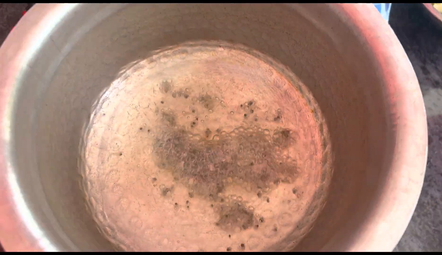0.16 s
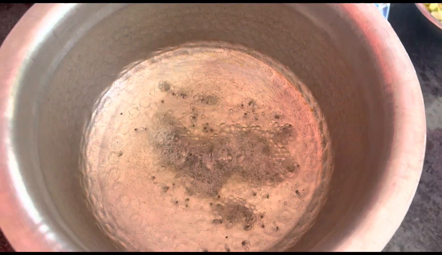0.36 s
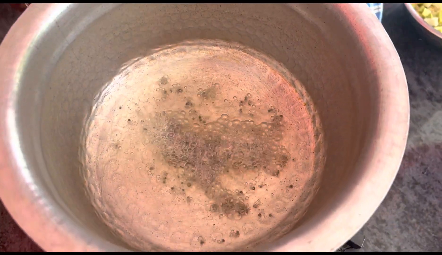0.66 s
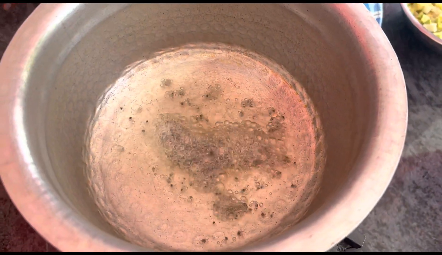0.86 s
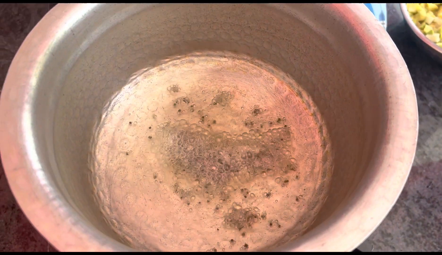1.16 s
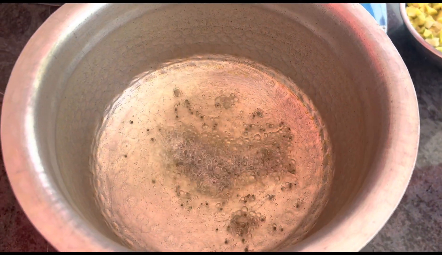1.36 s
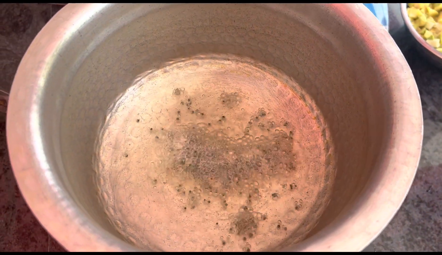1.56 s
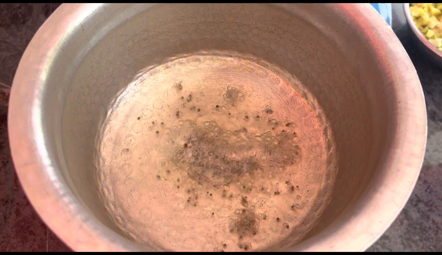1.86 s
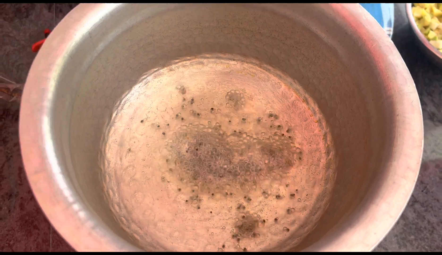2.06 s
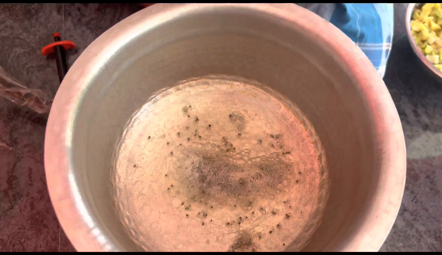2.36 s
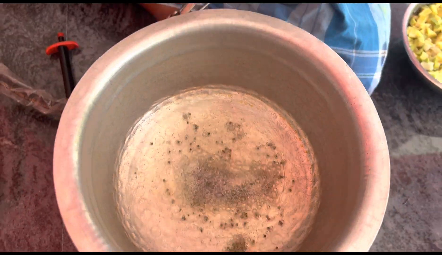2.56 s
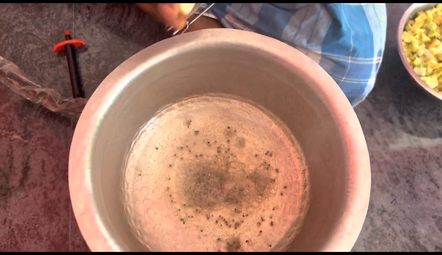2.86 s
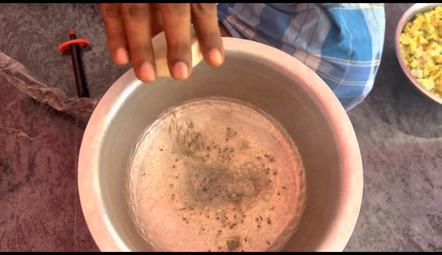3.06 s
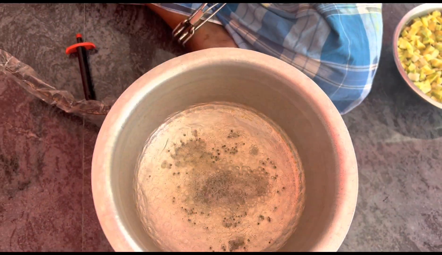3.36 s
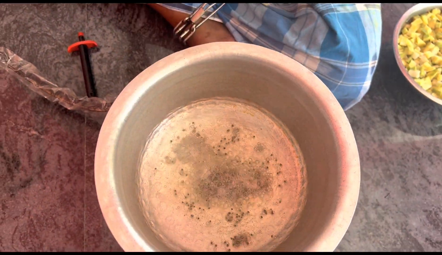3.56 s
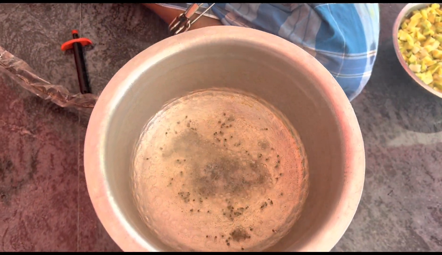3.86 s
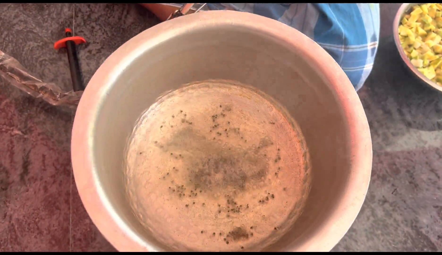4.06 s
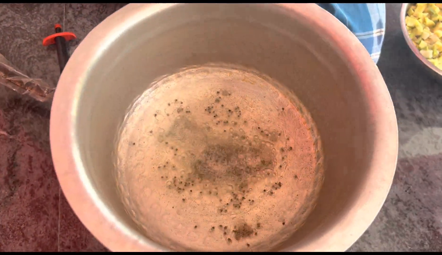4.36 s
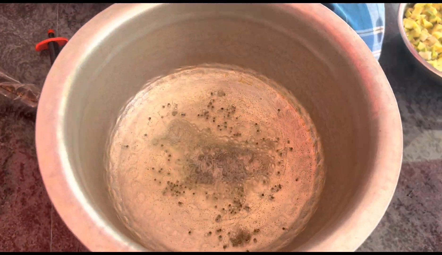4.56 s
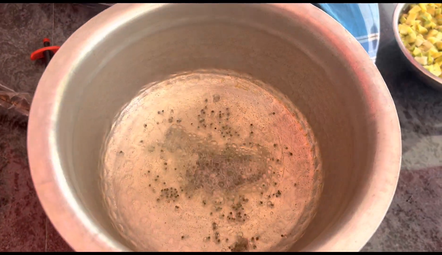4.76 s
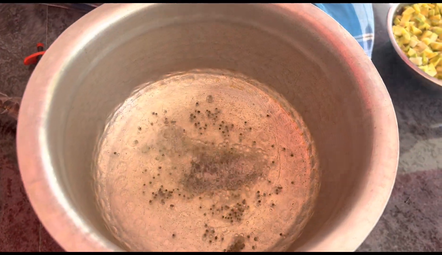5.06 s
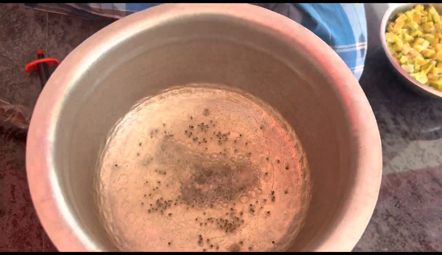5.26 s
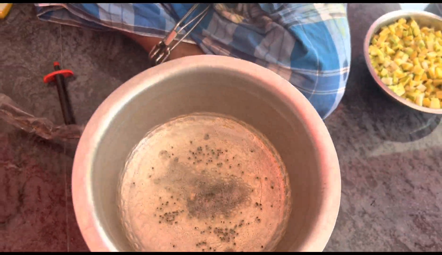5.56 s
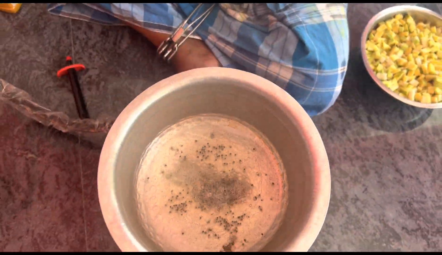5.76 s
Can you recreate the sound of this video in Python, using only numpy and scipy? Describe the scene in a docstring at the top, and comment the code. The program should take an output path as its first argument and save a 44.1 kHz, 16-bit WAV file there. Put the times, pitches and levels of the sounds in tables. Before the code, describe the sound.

Small seeds pop and splutter in fizzing hot oil in a metal pot, over a burner's faint low hum.

```python
"""Small seeds burst in hot oil in a wide metal pot, close under a hand-held camera. From the start
each pop is a snap, a short hollow note and a dying spray; the oil fizzes between them and a low hum
wavers over the burner's rush. From 0.75 s the camera's casing slips in the hand, creaking near 3.3 s.
Between 3.2 and 4.4 s a vessel further off is knocked four times, the last the hardest.
Towards the end the pops thin out and the fizz sinks."""
import sys
import numpy as np
from scipy import signal
from scipy.fft import rfft, irfft, next_fast_len
from scipy.io import wavfile
from scipy.ndimage import uniform_filter1d, map_coordinates

SR = 44100
rng = np.random.default_rng(int(sys.argv[2]) if len(sys.argv) > 2 else 0)


def transcribe(signal):
    """Save signal, clipped to [-1, 1], as a 16-bit WAV file at the path in sys.argv[1]."""
    frames = np.atleast_2d(signal).T
    limited = np.clip(frames, -1, 1)
    pcm = np.round(limited * 32767).astype(np.int16)
    wavfile.write(sys.argv[1], SR, pcm)


N = 260315

# how hard the oil fries: t/s, sizzle level/dB, steam hiss level/dB
FRYING = [(0.0, -37, -65), (1.13, -36, -56), (1.28, -40.5, -50), (1.79, -36, -53), (1.95, -40.5, -43.5),
          (2.45, -37, -47.5), (2.68, -37, -44.5), (2.96, -41, -52), (3.07, -41, -45), (3.3, -44, -56),
          (3.55, -41, -50), (3.93, -43.5, -59), (4.16, -39.5, -43.5), (4.32, -35, -43), (4.62, -45.5, -49),
          (4.81, -49.5, -50.5), (5.06, -39.5, -50), (5.9, -45, -58.5)]


def pops(spread_db=3.5):
    """The husk snaps; the steam pocket sounds a note, thuds in the oil and rings the pot; spray trails."""
    # the louder seeds: t/s, note level/dB, note f/Hz, snap level/dB, spray against the note/dB
    loud_pops = [(.0152, -10, 2290, -17, -23), (.0242, -3, 3500, -10, -15), (.069, -12, 2940, -10, -20),
                 (.0947, -11.5, 7350, -36, -20), (.0983, -7, 2680, -30, -14), (.1579, -10, 2800, -17, -25),
                 (.1745, -14.5, 3430, -37, -15), (.208, -8.5, 4550, -16, -9), (.2117, -6, 6550, -29, -24),
                 (.228, -14, 4000, -34, -6), (.238, -11, 5200, -34, -12), (.2451, -18, 1250, -32, -2),
                 (.2728, -6, 2760, -18, -11), (.3375, -11, 5840, -16, -21), (.3571, -24, 4440, -17, -29),
                 (.3832, -19.5, 6400, -23, -15), (.4072, -12, 5000, -17, -14), (.464, -17.5, 2700, -40, -3),
                 (.4808, -14, 6600, -26, -23), (.4925, -9, 2950, -35, -5), (.5102, -3, 6700, -2.5, -21),
                 (.5617, -18.5, 3190, -30, -3), (.571, -11.5, 4730, -14, -8), (.635, -16, 3520, -30, -23),
                 (.653, -18, 2620, -31, -25), (.688, -7, 6270, -11, -21), (.6909, -10.5, 2640, -28, -4),
                 (.6988, -8, 3420, -6.5, -16), (.7525, -16.5, 2820, -20, -6),
                 (.7841, -14.5, 8160, -32, -16), (.821, -12.5, 3480, -37, -8),
                 (.8511, -13.5, 3490, -33, -17), (.8636, -14, 3450, -28, -12), (.9304, -7, 5750, -44, -15),
                 (.936, -12.5, 3270, -9.5, 3), (.9503, -15, 3520, -38, -20), (1.003, -19.5, 2660, -46, -14),
                 (1.1034, -16, 6440, -30, -21), (1.1138, -13, 5860, -13.5, -7),
                 (1.154, -14.5, 3300, -21, -2), (1.1806, -11, 2900, -16, -11), (1.2233, -19, 3500, -37, -6),
                 (1.2278, -13.5, 7160, -27, -13), (1.282, -15.5, 5470, -15, -17),
                 (1.2871, -13.5, 3360, -19, -3), (1.3161, -15.5, 2700, -22, -7),
                 (1.331, -13.5, 8100, -26, -13), (1.341, -18.5, 4670, -13.5, -4),
                 (1.3936, -19.5, 5100, -35, -7), (1.4395, -12, 5870, -18, -25), (1.4804, -9, 3180, -6, -17),
                 (1.5049, -11, 6200, -19, -19), (1.5569, -14, 2630, -24, 4), (1.5767, -20, 5100, -35, -14),
                 (1.584, -8.5, 3950, -7.5, -12), (1.598, -11.5, 2390, -28, -14),
                 (1.636, -9.5, 6860, -14, -10), (1.6432, -7.5, 3520, -10, -14),
                 (1.7136, -14.5, 3800, -13, -8), (1.7273, -15, 6800, -39, -11),
                 (1.7813, -12.5, 3350, -36, -14), (1.8173, -20.5, 2740, -39, 0),
                 (1.8475, -20, 4100, -26, -7), (1.8573, -20, 5760, -17, -23),
                 (1.912, -13.5, 3000, -31, -14), (1.9244, -12, 7550, -11, -19),
                 (1.9352, -10, 3170, -10, -10), (1.9727, -15, 3540, -7.5, -11),
                 (1.9928, -22.5, 3190, -38, -13), (2.101, -15, 3240, -7.5, -16),
                 (2.1055, -13.5, 5700, -25, -2), (2.1516, -15, 3480, -14, -5.5),
                 (2.3473, -9, 3830, -19, -12), (2.369, -19, 3050, -21, -4), (2.407, -17, 3020, -16, -18),
                 (2.4476, -13, 5930, -13, -29), (2.4858, -11.5, 3030, -10, -13),
                 (2.5063, -16, 4090, -22, -20), (2.5403, -13.5, 3960, -36, -19),
                 (2.5562, -13, 5730, -17, -28), (2.5662, -14, 3950, -23, -19),
                 (2.5954, -11, 3770, -38, -10), (2.6136, -9, 2730, -38, -11.5), (2.738, -17, 5700, -16, -8),
                 (2.794, -22.5, 7000, -20, -6), (2.8195, -19, 5700, -13.5, -13),
                 (2.8375, -22, 5600, -16, 6), (2.8505, -16.5, 4050, -34, -10), (2.8711, -18, 3500, -18, -8),
                 (2.8808, -22, 3130, -32, -27), (2.9265, -9, 2740, -39, -8), (3.0451, -19, 6000, -10, 11),
                 (3.0491, -11.5, 8550, -14, -6), (3.0594, -15, 8270, -26, -9), (3.095, -20, 4100, -26, -5),
                 (3.1001, -22, 2290, -33, -11), (3.2599, -24.5, 4400, -25, -3),
                 (3.3076, -17, 3760, -23, -14), (3.3308, -15.5, 2800, -40, -10),
                 (3.3636, -10, 2540, -36, -5.5), (3.3858, -15, 2200, -30, -8),
                 (3.402, -7.5, 2450, -34, -13), (3.437, -22.5, 2150, -30, 3), (3.4706, -16, 3100, -18, -1),
                 (3.4905, -16, 2460, -22, -16), (3.5097, -15, 2700, -37, -22), (3.5269, -12, 2380, -27, -6),
                 (3.5367, -11, 2180, -36, -7), (3.5575, -12, 4400, -17, -9.5),
                 (3.6858, -20.5, 2730, -9, -7), (3.6932, -14.5, 2340, -44, -10),
                 (3.732, -11, 3900, -24, -13), (3.757, -23, 2620, -37, -3),
                 (3.8041, -11.5, 2680, -17, -6.5), (3.8517, -13.5, 6740, -25, -6),
                 (3.856, -9, 3270, -15, -4.5), (3.928, -17, 2080, -31, -6), (3.95, -15, 5900, -10, -16),
                 (4.1097, -17, 3800, -5.5, -21), (4.1198, -12.5, 4800, -15, -5.5),
                 (4.1494, -18.5, 2780, -37, -5), (4.3119, -9, 2730, -21, -11.5),
                 (4.3248, -17, 2580, -14.5, -15), (4.461, -16.5, 2450, -40, 1),
                 (4.4958, -21, 6980, -19, -21), (4.5047, -14, 2530, -43, -10.5),
                 (4.6687, -22, 3200, -21, -15), (4.7746, -25, 3330, -26, -1), (4.8138, -25, 2000, -39, -25),
                 (4.834, -20.5, 3670, -37, -10), (4.8379, -17, 5400, -12, -11),
                 (4.9045, -18.5, 2940, -25, -4), (4.928, -17.5, 3640, -29, -17),
                 (5.0327, -17, 3300, -5, -8), (5.0441, -12.5, 1900, -31, -17),
                 (5.1251, -4.5, 3720, -27, -15.5), (5.1434, -24, 3300, -13, -9),
                 (5.206, -11, 4860, -9.5, -7), (5.2394, -23, 2960, -28, -14),
                 (5.3236, -20, 4280, -16.5, -7), (5.3296, -14.5, 7050, -42, -19),
                 (5.3902, -12.5, 2880, -23, -15), (5.4513, -15.5, 6300, -24, -24),
                 (5.5438, -25, 4100, -23, -10), (5.5659, -36, 5640, -20, -20),
                 (5.5758, -13.5, 2280, -15.5, -4), (5.6294, -25, 4360, -24, -3),
                 (5.6543, -14.5, 4100, -34, -22), (5.6642, -17, 3260, -46, -9),
                 (5.7466, -28, 4390, -46, -14), (5.7733, -17.5, 4430, -14, -10)]
    # modes of the pot's wall and air, lowest first: f/Hz, width/Hz, level/dB
    pot_modes = [(1186, 44, 8.5), (1820, 9.8, -1), (2130, 17, 10), (2345, 16, 12), (2886, 64, 5.5),
                 (3625, 144, 2.5), (4146, 94, 6), (6200, 690, 1)]
    low_hz, low_width, low_db = pot_modes[0]
    s, db, hz, snap_db, spray_db = np.vstack([loud_pops, faint_pops()]).T[:, :, None]
    weight, place = rng.standard_normal((len(s), 2)).T[:, :, None]
    # the thud grows slower than the note; deeper notes thud harder
    thud_db = -26 + 0.52 * db - 2 * np.log2(hz / 3000) + 3 * weight
    t = np.arange(SR // 11) / SR
    note_noise, crack_noise = rng.standard_normal((len(s), 2, 2, len(t))).transpose(1, 2, 0, 3)
    hit = lambda peak_s: t / peak_s * np.exp(1 - t / peak_s)
    tail = lambda db, t60: amp(db - 60 * t / t60) * (1 - np.exp(-t / 0.00041)) * (1 - t / t[-1])
    pot = lambda f: sum(amp(level) * resonance(f, mode, width) for mode, width, level in pot_modes[1:])
    near = lambda f: resonance(f, hz, 1.08 * hz) ** 2  # a pop wakes the modes around its own note
    pocket = lambda f: resonance(f, hz, 0.5 * hz) ** 2 + 0.45 * resonance(f, 3880, 4960) ** 2
    note = burst(note_noise, hit(0.00053) + tail(-7.5, 0.025) + tail(spray_db - 2.5, 0.66),
                 lambda f: pocket(f) + 0.38 * pot(f) * near(f))
    snap = burst(crack_noise, hit(0.0004) + tail(-14, 0.015) + tail(spray_db - 22, 0.24),
                 lambda f: resonance(f, 11520, 5400) ** 2)
    thud = burst(crack_noise, hit(0.00041) + tail(-9.5, 0.14),
                 lambda f: resonance(f, 698, 1020) ** 2 + amp(low_db) * resonance(f, low_hz, low_width))
    body = (amp(db) * note + amp(thud_db) * thud) * sides(spread_db * place)
    return placed(s[:, 0], body + amp(snap_db) * snap)


def faint_pops(per_second=11, spray_db=-15):
    """Rows of small pops at random moments, louder where the oil sizzles harder."""
    count = round(per_second * N / SR)
    s = rng.random(count) * (N / SR)
    size, pitch, bright = rng.standard_normal((count, 3)).T
    sizzle_db = curves(FRYING)[0][(s * SR).astype(int)]
    db = sizzle_db + 9.5 + 3 * size
    hz = 4000 * 2 ** (0.43 * pitch)
    snap_db = db - 6.5 + 6 * bright
    return np.transpose([s, db, hz, snap_db, np.full(count, spray_db)])


def fizz(patch_db=3.33):
    """Countless small bubbles: patchy noise with ticks on it, coloured as sizzle and as steam."""
    # spectra of the sizzling oil and the hissing steam: f/Hz, relative level/dB
    sizzle_eq = [(500, -25), (900, -6.5), (1170, -1), (1500, 0), (2300, 4.5), (4100, 3), (6350, 5),
                 (7800, -3.5), (9500, -13), (12000, -10.5), (22000, -62)]
    steam_eq = [(2500, -48), (5000, -56), (8000, 12), (10000, -5), (11500, 11), (13500, -6), (15500, 4),
                (17000, -27)]
    sizzle_db, steam_db = curves(FRYING)
    spectra = signal.stft(rng.standard_normal((2, N)), nperseg=256)[2]
    patches = uniform_filter1d(rng.standard_normal(spectra.shape[1:]), size=5, axis=0)  # across pitch
    patches = uniform_filter1d(patches, size=7, axis=1)  # across time
    patchy = signal.istft(spectra * amp(patch_db * unit(patches)), nperseg=256)[1][:, :N]
    grainy = unit(patchy) + 0.19 * ticks()
    sizzle = unit(filtered(grainy, lambda f: amp(along(sizzle_eq, f))))
    steam = unit(filtered(grainy, lambda f: amp(along(steam_eq, f))))
    return amp(sizzle_db) * sizzle + amp(steam_db) * steam


def ticks(per_second=260):
    """Tiny bubbles burst all the time: dry clicks of about one cycle, most of them faint."""
    when, pitch, size, pan = rng.random((round(per_second * N / SR), 4)).T[:, :, None]
    hz = 3000 * 4 ** pitch
    t = np.arange(128) / SR
    gain = amp(-6.5 * np.log(size.clip(.06, 1)))
    clicks = gain * np.sin(2 * np.pi * hz * t) * np.exp(-t * hz / .7)
    return unit(placed(when[:, 0] * N / SR, sides(8 * pan - 4) * clicks))


def casing_slips(left_db=5.5):
    """The hand slips on the left; each jolt crosses the casing as a bending wave, low pitches last."""
    # single slips: t/s, peak level/dB, centre f/Hz
    single_slips = [(.753, -25, 590), (1.114, -32, 604), (1.730, -14.5, 620), (1.748, -31, 600),
                    (1.860, -21.5, 417), (1.968, -25, 456), (2.014, -30, 445), (2.174, -35, 240),
                    (2.251, -30.5, 398), (2.334, -38.5, 276), (2.532, -25, 484), (3.097, -39, 497),
                    (3.268, -30.5, 545), (3.408, -32, 450), (3.562, -33.5, 510), (3.886, -28, 800),
                    (3.89, -23, 600), (3.897, -30, 700), (3.905, -28, 497), (5.477, -38.5, 294)]
    s, db, hz = np.vstack([single_slips, creak()]).T[:, :, None]
    lead = 64  # samples ahead of the jolt
    impulses = np.tile(signal.unit_impulse(2048, lead), (len(s), 1))
    bending = lambda f: np.exp(-2j * np.pi * 0.903 * np.log(np.clip(f, 60, 1500) / 1500))
    dull = lambda f: resonance(f, hz, 1.27 * hz) / (1 + (f / (1.8 * hz)) ** 4)
    jolts = filtered(impulses, lambda f: bending(f) * dull(f))
    jolts = amp(db) * jolts / np.abs(jolts).max(axis=1, keepdims=True)
    return placed(s[:, 0] - lead / SR, sides(left_db)[:, None, None] * jolts)


def creak(start_s=3.274, first_gap_s=.0038, slowing=1.13, count=7, hz=523):
    """Rows for a quick run of casing slips, ever slower, and harder up to a ceiling."""
    k = np.arange(count)
    s = start_s + first_gap_s * (slowing ** k - 1) / (slowing - 1)
    db = np.minimum(-36 + 8 * k, -23)
    return np.transpose([s, db, np.full(count, hz)])


def vessel_knocks(room_db=-6, room_t60=0.69):
    """A vessel further off is bumped; light taps wake mostly its upper modes, and the kitchen answers."""
    # bumps: t/s, peak level/dB, trim of the modes under 650 Hz/dB, left over right/dB
    bumps = [(3.224, -47, -12, 1), (3.435, -23.5, -23, 4), (3.67, -30.5, -26, 1.5),
             (4.385, -11.5, -8.5, 2.5)]
    # the vessel's modes: f/Hz, level/dB, t60/s
    modes = [(245, -7.5, 0.14), (349, -2, 0.14), (424.5, 1, 0.17), (523.3, 6.5, 0.16), (623.4, 6.5, 0.17),
             (667, -5, 0.087), (701, 6.5, 0.059)]
    out = np.zeros((2, N + SR))
    t = np.arange(SR // 2) / SR
    for s, db, low_db, pan_db in bumps:
        ring = sum(amp(level + low_db * (hz < 650) - 60 * t / t60) * np.sin(2 * np.pi * hz * t)
                   for hz, level, t60 in modes)
        ring *= (1 - np.exp(-t / 0.0014)) ** 2  # a soft contact
        ring /= np.abs(ring).max()
        room = rng.standard_normal((2, len(t))) * amp(-60 * t / room_t60)
        wet = signal.fftconvolve(ring[None], room / np.linalg.norm(room[0]), axes=1)[:, :len(t)]
        out[:, round(s * SR):][:, :len(t)] += amp(db) * sides(pan_db)[:, None] * (ring + amp(room_db) * wet)
    return out[:, :N]


def burner():
    """A wavering hum over the flame's low, fluttering rush, much alike on both sides."""
    # the flame's rise and fall: t/s, level/dB
    flame_levels = [(0.0, -55.5), (2.14, -51), (2.41, -53), (2.56, -55), (4.47, -52), (4.86, -55.5),
                    (5.9, -55.5)]
    # the flame's spectrum: f/Hz, relative level/dB
    flame_eq = [(15, -36), (25, -17), (65, 2.5), (109, -0.5), (201, -3), (284, -6), (578, -5), (1050, -14),
                (1180, -27), (1300, -14), (1690, -57), (2860, -120)]
    narrow_noise = lambda width: rng.standard_normal(N) + width * rng.standard_normal((2, N))
    hum_db = -55 + 2.5 * wobble(5)
    hum_hz = 61 + 1.19 * wobble(4.1)
    tone = np.sin(2 * np.pi * np.cumsum(hum_hz) / SR) * amp(2.3 * wobble(8.4))
    rumble = unit(filtered(narrow_noise(0.4), lambda f: resonance(f, 60.9, 15) ** 2))
    hum = unit(tone + 0.66 * rumble)
    notch = lambda f: np.abs(1 - resonance(f, 66, 29))  # leaves room for the hum
    rush = unit(filtered(narrow_noise(0.58), lambda f: amp(along(flame_eq, f)) * (f > 25) * notch(f)))
    rush_db = curves(flame_levels)[0] + 1.8 * wobble(14) + 1.5 * wobble(40)
    return amp(hum_db) * hum + amp(rush_db) * rush * sides(1.5)[:, None]


def pot_stereo(pair):
    """The pot's walls scramble the mids, which reach the left port first; the treble leads on the right."""
    # likeness of the two microphone ports: f/Hz, coherence/0..1
    likeness = [(700, 0.64), (2000, 0.38), (8000, 0.051), (9800, 0.99), (16000, 0.97)]
    # colour of the ports: f/Hz, left over right/dB
    balance = [(700, 0.5), (1300, 3.5), (2200, -2.5), (3400, 2), (5400, 0.5), (6500, 3), (8100, -6),
               (9600, 0.5), (16000, -0.5)]
    alike = lambda f: np.clip(along(likeness, f), 0, .999)
    right_lead_cycles = lambda f: np.where(f < 8300, -f * .00015, (f - 12000) / 3480)
    shared = filtered(pair[0], lambda f: alike(f) * np.exp(2j * np.pi * right_lead_cycles(f)))
    own = filtered(pair[1], lambda f: np.sqrt(1 - alike(f) ** 2))
    return filtered(np.array([pair[0], shared + own]), lambda f: sides(along(balance, f)))


def left_late(pair, lag_s=0.00046):
    """The sound reaches the left port a little later."""
    return filtered(pair, lambda f: np.exp(-2j * np.pi * f * [[lag_s], [0]]))


def burst(noise, envelope, response):
    """Enveloped, filtered noise, scaled to peak at 1 in its first 5 ms."""
    out = filtered(noise * envelope, response)
    return out / np.abs(out[..., :SR // 200]).max(axis=2, keepdims=True)


def amp(db):
    """Gain of a level in dB."""
    return 10 ** (np.asarray(db) / 20)


def unit(x):
    """Scaled to rms 1."""
    return x / np.sqrt(np.mean(x ** 2) + 1e-20)


def along(points, hz):
    """A curve through (f/Hz, value) points on a log axis."""
    f, v = np.transpose(points)
    return np.interp(np.log(hz + 1), np.log(f + 1), v)


def curves(rows):
    """One value per sample for each column after the time."""
    s, *cols = np.transpose(rows)
    return [np.interp(np.arange(N) / SR, s, c) for c in cols]


def wobble(rate):
    """A smooth random curve, rate knots a second."""
    return map_coordinates(rng.standard_normal(int(N * rate / SR) + 4), [np.arange(N) * rate / SR])


def filtered(x, response):
    """x through a complex frequency response, along the last axis."""
    m = next_fast_len(x.shape[-1] + 1024)
    return irfft(rfft(x, m) * response(np.fft.rfftfreq(m, 1 / SR)), m)[..., :x.shape[-1]]


def resonance(f, hz, width_hz):
    """A causal peak of gain 1."""
    return 1j * f * width_hz / (hz * hz - f * f + 1j * f * width_hz)


def placed(times, sounds):
    """Sounds (side, event, sample) laid on a stereo track at their times."""
    at = np.round(np.asarray(times) * SR).astype(int)[:, None] + np.arange(sounds.shape[-1])
    return np.array([np.bincount(at.ravel(), side.ravel(), N + SR)[:N] for side in sounds])


def sides(pan_db):
    """Left and right gains; positive leans left."""
    return amp(np.multiply.outer([.5, -.5], pan_db))


def scene():
    """Seeds and oil up front, then hand and vessel, with the burner underneath."""
    return pot_stereo(pops() + fizz()) + left_late(casing_slips() + vessel_knocks()) + burner()


def record(dry, ceiling=.8, top_hz=16300):
    """The highest peaks are softly rounded, and the top treble rolls off steeply."""
    rounded = dry / (1 + np.abs(dry / ceiling) ** 5) ** (1 / 5)
    droop = lambda f: amp(-np.clip(f - top_hz + 600, 0, 900) / 60)
    cutoff = lambda f: np.clip((top_hz + 500 - f) / 400, 0, 1) ** 3
    return filtered(rounded, lambda f: droop(f) * cutoff(f))


dry = scene()
out = record(dry)
transcribe(out)
```